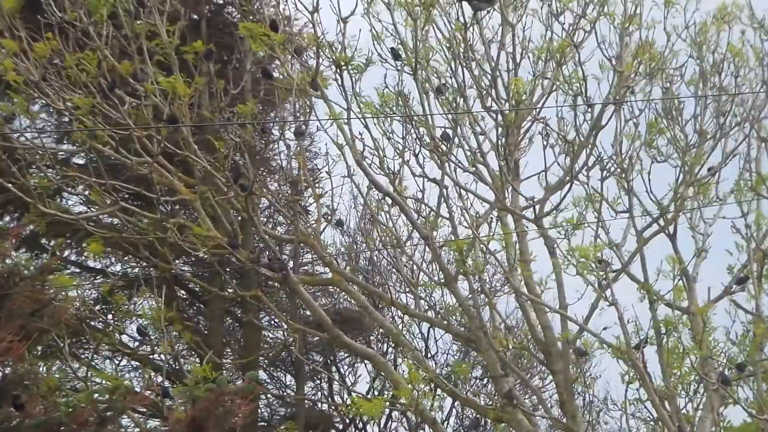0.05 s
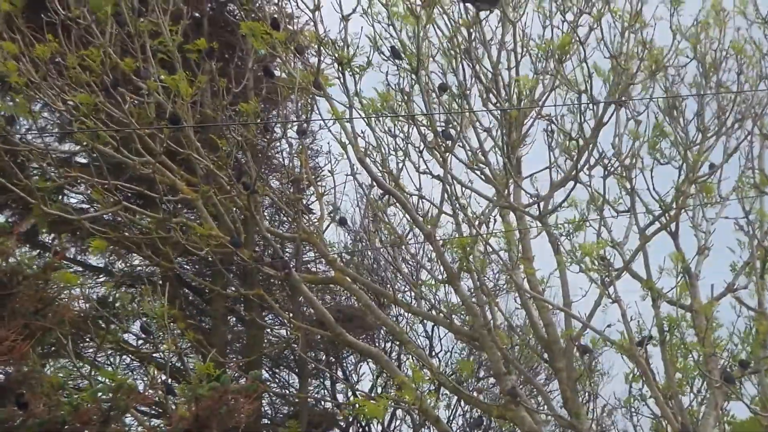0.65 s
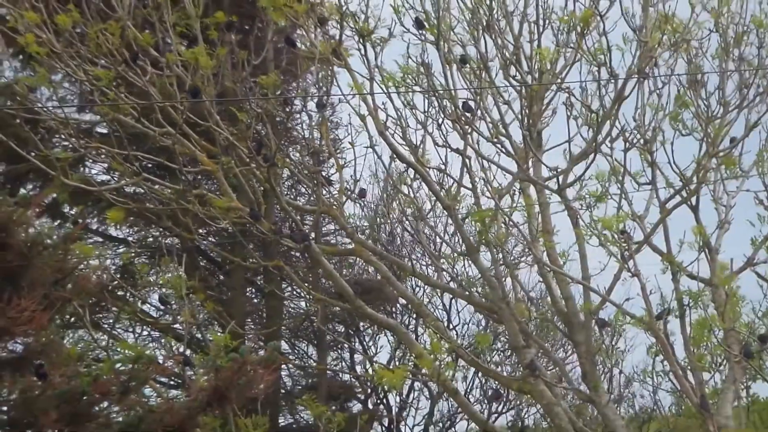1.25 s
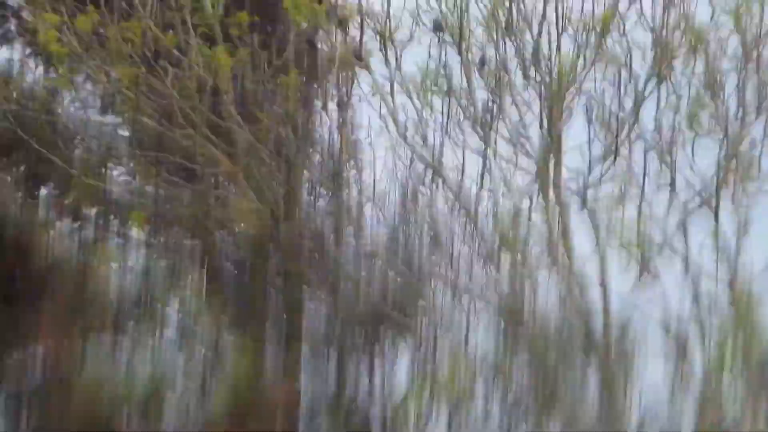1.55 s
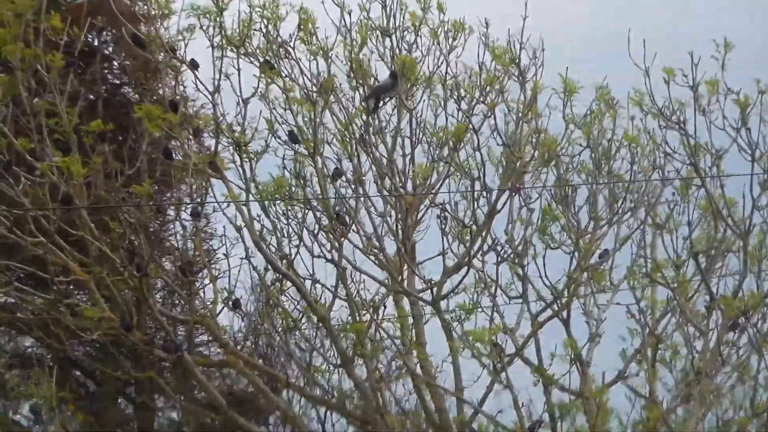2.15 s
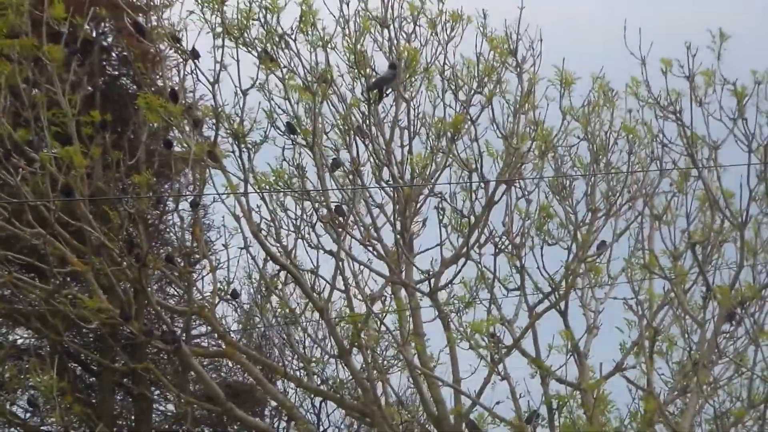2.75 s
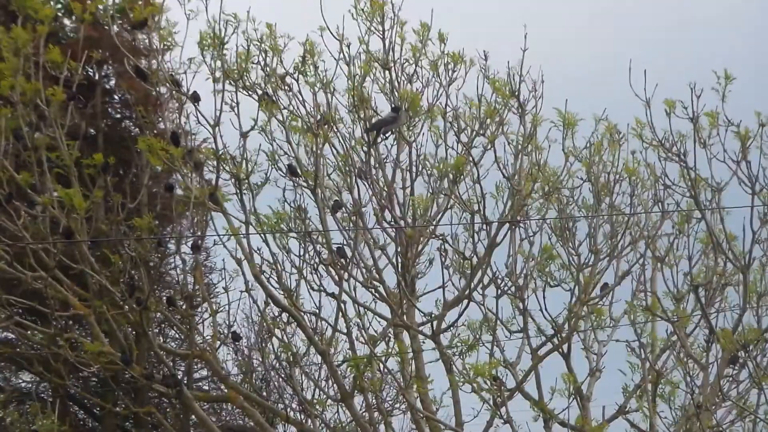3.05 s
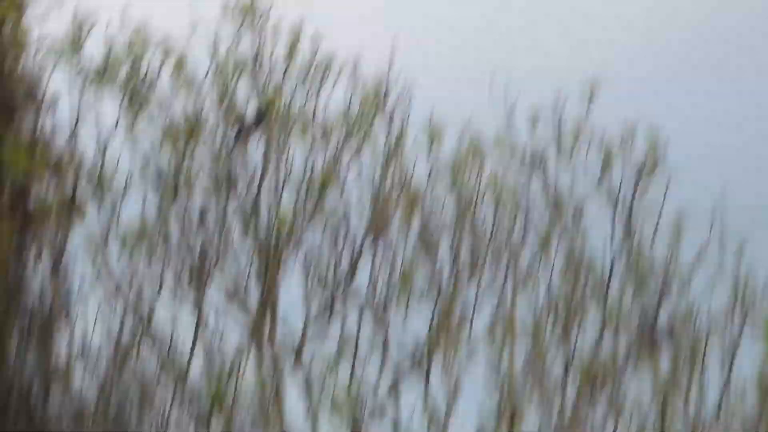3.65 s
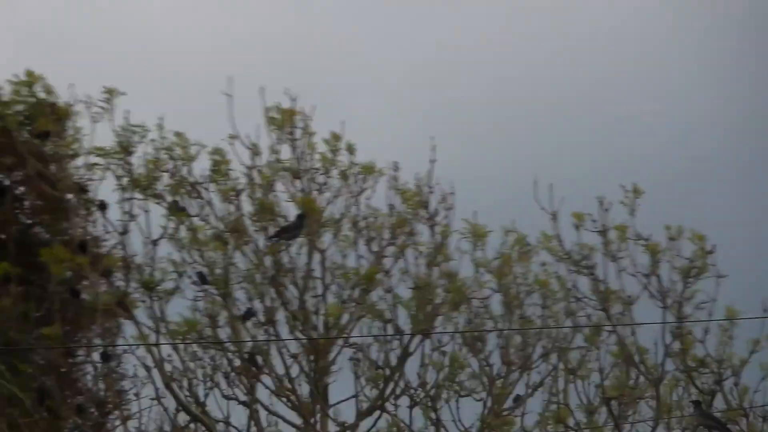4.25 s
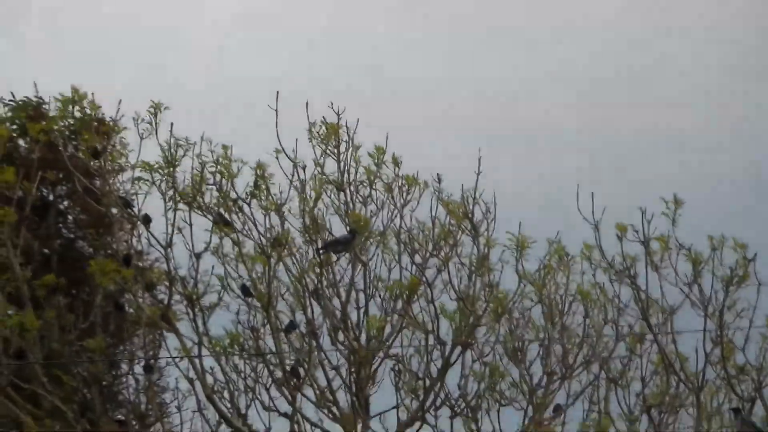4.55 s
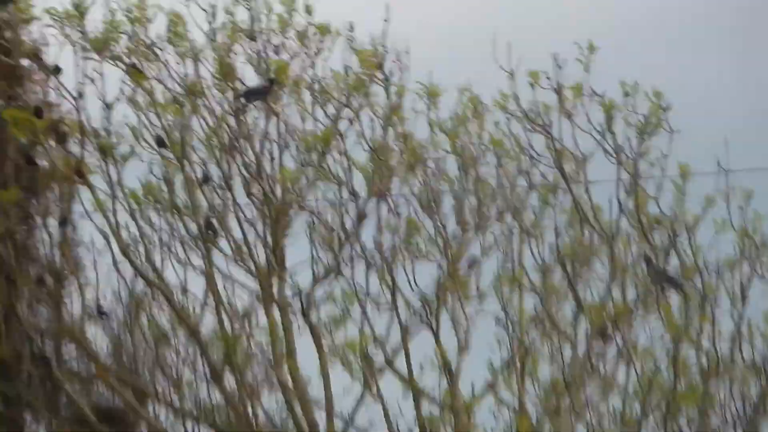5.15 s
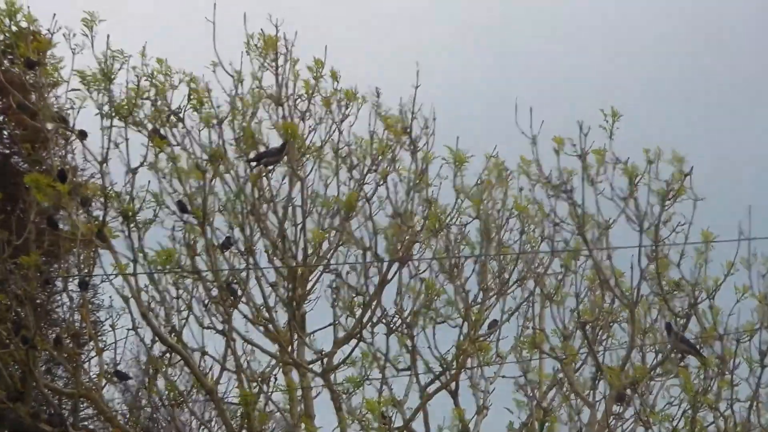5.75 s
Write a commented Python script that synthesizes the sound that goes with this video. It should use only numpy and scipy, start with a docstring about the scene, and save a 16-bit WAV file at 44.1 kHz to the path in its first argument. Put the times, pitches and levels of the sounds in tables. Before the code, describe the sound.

Sparrows chirp repeatedly in tall trees, their high, slightly raspy calls leaving a short woodland echo. A distant flock chatters softly and other birds add faint gliding whistles. Light wind rumbles on and off against the microphone over a soft outdoor hiss. Late on, a hand shifts on the camera, bringing a close, scuffing run of plastic creaks and then separate ticks, while the birds carry on.

```python
"""From the start, sparrows chirp in tall trees, each call scattered by trunks and twigs, while a far
flock chatters and light wind buffets the microphone openings. After a second other birds whistle
farther off. Near 2 s the wind picks up and the hand-held camera rubs softly. From about 4.3 s it is
re-aimed: the palm scuffs it, and its plastic shell sticks and slips in three creaks, then in lone
ticks. More whistles join the last chirps."""
import sys
import numpy as np
from scipy import signal
from scipy.fft import rfft, irfft, next_fast_len
from scipy.io import wavfile
from scipy.ndimage import map_coordinates

SR = 44100
rng = np.random.default_rng(int(sys.argv[2]) if len(sys.argv) > 2 else 0)


def put_to_file(sound):
    """Save the sound as 16-bit audio at rate SR, in the file named by the first command-line argument."""
    columns = np.atleast_2d(sound).T  # one column per channel
    safe = np.clip(columns, -1, 1)
    whole_steps = np.round(safe * 32767)
    wavfile.write(sys.argv[1], SR, whole_steps.astype(np.int16))


N = 255339

# three shapes of a sparrow's note: (time [s], pitch [Hz], level [dB])
CHEEP = [(0, 4100, -14), (.011, 4650, 3), (.022, 4450, 2.5), (.038, 4200, 1), (.046, 3700, -6),
         (.060, 3450, -3.5), (.072, 3100, -16), (.080, 2800, -28)]
ARCH = [(0, 3800, -15), (.007, 4700, -3), (.017, 5280, -4), (.028, 4800, 0), (.038, 3950, 0),
        (.05, 3600, -6), (.06, 3300, -24)]
CHIP = [(0, 3400, -25), (.01, 4300, 3.5), (.02, 4750, 14.5), (.034, 4350, -3), (.05, 3700, -28),
        (.07, 3100, 10)]


def sparrows(two_note_echo_db=-3):
    """Near birds; a call opens with a thin squeak from the second side of the bird's voice box."""
    # one-note calls: (time [s], shape, pitch [ratio], length [ratio], level [dB], rasp [0-1])
    chirps = [(.180, CHEEP, 0.98, 0.97, -25.5, 0.34), (.905, CHEEP, 0.97, 1.14, -28.5, 0.66),
              (1.855, CHIP, 0.96, 0.88, -41, 0.87), (2.289, CHEEP, 0.99, 1.1, -27, .5),
              (3.096, ARCH, 0.96, 1.45, -27, 0.83), (3.662, CHEEP, 0.99, 1.2, -26.5, 0.52),
              (3.958, CHEEP, .96, 0.67, -36.5, 1), (4.272, CHEEP, 1.024, 1.42, -30, 0.77),
              (4.983, CHEEP, 0.93, 1.4, -33, 0.83), (5.145, CHEEP, 0.99, 1.16, -29, 0.66),
              (5.245, CHEEP, .97, 1.3, -36.5, 0.84), (5.303, CHIP, 1.03, 0.96, -43, .7)]
    # two-note calls, an arch then a flick, from birds in the open, with less echo:
    # (time [s], pitch [ratio], length [ratio], arch level [dB], flick level [dB], rasp [0-1])
    chirrups = [(.552, 0.98, 0.93, -27, -26, 0.15), (1.483, 0.93, 0.77, -28, -29.5, .5),
                (1.548, 0.94, 0.98, -26, -29.5, 0.58), (2.035, 0.96, 0.91, -27.5, -26.5, 0.25),
                (2.647, .9, .9, -30, -31, 0.42), (3.347, 0.96, 0.99, -30.5, -28.5, 0.35)]
    # shapes of the flick and the squeak: (time [s], pitch [Hz], level [dB])
    flick_shape = [(0, 3100, -16), (.01, 3550, -1), (.02, 4250, 0), (.029, 3650, -6), (.039, 3100, -4),
                   (.05, 2800, -23)]
    squeak_shape = [(0, 4880, 7.5), (.012, 5400, 5), (.025, 5900, 1.5), (.033, 5370, 0), (.042, 6400, -5),
                    (.06, 5450, -14)]
    out = np.zeros((2, N))
    first_notes, flicks = [(*row, 0) for row in chirps], []  # 0 dB: full echo
    for s, pitch, length, arch_db, flick_db, rasp in chirrups:
        first_notes.append((s, ARCH, pitch, length, arch_db, rasp, two_note_echo_db))
        flicks.append((s + .069 * length, flick_shape, .99, length, flick_db, rasp, two_note_echo_db))
    for s, shape, pitch, length, db, rasp, echo_db in first_notes + flicks:
        voice = bird_note(shape, pitch, length, rasp)
        call = among_trees(voice, near_db=echo_db - 4, far_db=echo_db - 2, near_fade_s=.22,
                           trunk_db=echo_db - 4)
        add(out, s, amp(db) * call)
    for s, _, _, _, db, _, echo_db in first_notes:
        voice = bird_note(squeak_shape, pitch=1, length=1.1, rasp=.9)
        squeak = among_trees(voice, near_db=1, far_db=1, near_fade_s=.15)
        add(out, s - .025, amp(db + echo_db - 24) * squeak)
    return out


def bird_note(shape, pitch, length, rasp):
    """One sliding tone from a bird's voice box; rasp shakes its pitch and loudness."""
    s, hz, db = np.transpose(shape)
    t = np.arange(int(s[-1] * length * SR)) / SR
    sweep_hz = pitch * np.interp(t / length, s, hz) * (1 + .1 * rasp * wobble(700, len(t)))
    phase = 2 * np.pi * np.cumsum(sweep_hz) / SR
    flutter = unit(amp(8 * np.minimum(rasp, .5) * np.tanh(wobble(300, len(t)))))
    level = amp(np.interp(t / length, s, db)) * flutter * signal.windows.tukey(len(t), .12)
    return level * (np.sin(phase) + amp(-37.5) * np.sin(2 * phase))


def among_trees(call, near_db, far_db, near_fade_s, trunk_db=-7, trunks=6):
    """A call arrives directly, bounces off trunks, scatters off near twigs and lingers in the wood."""
    # echo of the wood: (frequency [Hz], time to fade by 60 dB [s])
    wood_fade = [(2000, 0.6), (4300, 0.62), (8000, 0.13)]
    t = np.arange(SR * 3 // 4) / SR
    hz, times, spectrum = signal.stft(rng.standard_normal((2, len(t))), SR, nperseg=256)
    fade = amp(-60 * times / along(wood_fade, hz)[:, None])
    far = signal.istft(spectrum * fade, SR, nperseg=256)[1][:, :len(t)]
    near = rng.standard_normal((2, len(t))) * amp(-60 * t / near_fade_s)
    paths = (amp(near_db) * unit(near) + amp(far_db) * unit(far)) / np.sqrt(len(t))
    for channel, delays_s in zip(paths, rng.uniform(.002, .03, (2, trunks))):
        channel[(delays_s * SR).astype(int)] += amp(trunk_db) / np.sqrt(trunks)
    paths *= pan(-4.5)
    # the direct sound is stronger on the right
    paths[0, 0] += amp(-4.5)
    paths[1, 2] += amp(2.5)
    return signal.fftconvolve(call[None], paths, axes=1)


def creak(slips):
    """The camera shell sticks and slips beside the left microphone; fast slipping merges into a rub."""
    # sliding contact on the shell: (time [s], length [s], level [dB])
    rubs = [(1.738, 0.099, -37.5), (1.816, 0.074, -41), (1.932, 0.22, -46.5), (4.418, 0.43, -50.5),
            (4.487, 0.051, -28)]
    force, t = np.zeros(N), np.arange(SR // 100) / SR
    ring = shell_ring()
    for s, db in slips:
        # each slip is a cluster of tiny ones, longer as the movement slows
        drag_s = np.interp(s, [4.35, 4.6], [.0006, .0012])
        slip = .4 * rng.standard_normal(len(t)) * np.exp(-t / drag_s)
        slip[0] += 1
        # the first, fast slips let go more softly and are duller
        softness = np.interp(s, [4.4, 4.5], [.35, 0])
        slip = np.convolve(slip, [softness, 1, softness])
        strength = np.linalg.norm(np.convolve(slip, ring)) / np.sqrt(SR / 1000)
        add(force[None], s, amp(db + 1.5) * slip / strength)
    for s, length, db in rubs:
        size = int(length * SR)
        grit = unit(rng.standard_normal(size) * amp(0.99 * wobble(730, size))) / np.linalg.norm(ring)
        add(force[None], s, amp(db + 1) * grit * signal.windows.tukey(size, .7))
    left = signal.fftconvolve(force, ring)[:N]
    # the right side hears it smeared and dulled by the body: (frequency [Hz], gain [dB])
    dulling = [(2800, 1.5), (4700, -14.0), (6300, -21), (9500, -16), (15000, -11)]
    smear = unit(rng.standard_normal(len(t)) * np.exp(-t / .0004)) / np.sqrt(len(t))
    right = filtered(np.convolve(left, smear)[:N], lambda hz: amp(along(dulling, hz)))
    return np.array([left, right])


def shell_slips():
    """Every slip as (time [s], level [dB]); in a run the pace glides and the force may swell and ease."""
    # lone slips as the grip settles: (time [s], level [dB])
    ticks = [(3.534, -39), (4.5484, -17.7), (4.5666, -18.6), (4.7198, -26.4), (4.7471, -18.8),
             (4.7986, -18.8), (4.8825, -26.2), (4.9618, -18.3), (4.9891, -18.6), (5.0249, -18.5),
             (5.0776, -19.5), (5.1678, -24.7), (5.2137, -22.5)]
    # runs of slips: (time [s], length [s], first rate [1/s], last rate [1/s], level [dB], swell [dB])
    runs = [(4.2831, .11, 123, 79, -20.5, 5), (4.4303, .064, 55, 200, -21.5, .5),
            (4.597, .105, 66, 90, -21, 0)]
    slips = list(ticks)
    for s, length, first_rate, last_rate, db, swell_db in runs:
        progress = np.linspace(0, 1, int(length * SR))
        slips_so_far = np.cumsum(first_rate + (last_rate - first_rate) * progress) / SR
        places = np.interp(np.arange(int(slips_so_far[-1]) + 1), slips_so_far, progress)
        levels_db = db + swell_db * np.sin(np.pi * places) + rng.standard_normal(len(places))
        slips += zip(s + length * places, levels_db)
    return slips


def shell_ring(size=1024):
    """The brief, quickly damped ring of the plastic shell, scaled to a peak of 1."""
    # tone colour of the shell: (frequency [Hz], level [dB])
    shell_colour = [(100, -21), (500, -31), (1000, -30), (2000, -35.5), (3300, -17), (4000, -6), (4800, 2),
                    (6200, -5.5), (7500, -14.5), (9500, -16.5), (11500, -27), (16000, -37)]
    cepstrum = irfft(np.log(amp(along(shell_colour, np.fft.rfftfreq(size, 1 / SR)))))
    # keep the colour but pack the energy at the start, as in a tap
    cepstrum[1:size // 2] *= 2
    cepstrum[size // 2 + 1:] = 0
    ring = irfft(np.exp(rfft(cepstrum)))
    return ring / np.abs(ring).max()


def wind():
    """Swirls of wind strike each microphone separately, over the soft hiss of outdoor air."""
    # tone colours of the wind's rumble and of the air: (frequency [Hz], level [dB])
    rumble_colour = [(13, -48), (22, -20), (59, -1), (76, -2.5), (113, -0.5), (206, -13), (338, -30),
                     (365, -34.5), (500, -36), (650, -60), (1100, -120)]
    air_colour = [(25, -5), (100, -4.5), (250, -3), (500, -6), (1000, -11), (2000, -9.5), (4000, -1),
                  (8000, -16.5), (12000, -19), (16000, -20)]
    swirls = amp(3 * np.array([wobble(25, N), wobble(25, N)]))
    rumble = wind_strength() * unit(swirls * noise(rumble_colour)) * pan(3.5)
    # low sound from afar is more alike on both sides: (frequency [Hz], likeness [0-1])
    likeness = [(60, 0.34), (300, 0.61), (1200, 0.059), (4000, 0.079)]
    angle = lambda hz: np.arccos(along(likeness, hz)) / 2
    mid, side = filtered(noise(air_colour), lambda hz: np.array([np.cos(angle(hz)), np.sin(angle(hz))]))
    air = unit(np.array([mid + side, mid - side])) * pan(-1.8)
    return rumble + amp(-50 + 1.6 * wobble(2.94, N)) * air


def wind_strength(rise_s=0.0057, fall_s=0.013):
    """How hard the wind blows on the microphones: a breeze, and gusts that rise, hold and die away."""
    # the slowly changing breeze: (time [s], level [dB])
    breeze = [(0.0, -58), (0.61, -69), (1.53, -57.5), (1.74, -46.5), (2.24, -50), (2.53, -58),
              (3.11, -69.5), (3.77, -56.5), (3.9, -57.5), (4.84, -48), (5.05, -56), (5.79, -63)]
    # short gusts: (time [s], hold [s], level [dB])
    gusts = [(0.088, .15, -46), (0.88, 0.02, -40.5), (1.226, 0.068, -45), (1.511, .025, -46.5),
             (1.628, .13, -33.5), (1.865, 0.028, -38), (1.955, 0.032, -34.5), (2.167, 0.022, -33),
             (2.233, 0.05, -31), (2.351, 0.03, -33), (3.43, 0.0095, -42), (3.749, 0.022, -44),
             (4.026, 0.022, -36.5), (4.125, 0.069, -37), (4.703, 0.02, -31), (5.116, 0.0085, -39),
             (5.314, 0.053, -44.5), (5.78, .015, -37.5)]
    t = np.arange(N) / SR
    power = amp(curve(breeze) + 3.5) ** 2
    for s, hold, db in gusts:
        fade = np.maximum(s - t, 0) / rise_s + np.maximum(t - s - hold, 0) / fall_s
        power += (amp(db) * np.exp(-fade)) ** 2
    return np.sqrt(power)


def palm(slips):
    """The shifting hand scuffs the camera; once the grip is firm, slips also knock on its body."""
    # strength of the scuffing: (time [s], level [dB])
    grip = [(4.05, -68), (4.3, -61), (4.46, -52.5), (4.7, -61), (4.85, -58), (5.0, -61), (5.3, -58),
            (5.6, -70)]
    # its tone colour: (frequency [Hz], level [dB])
    scuff_colour = [(150, -31), (350, -1), (550, -0.5), (1100, -4), (2000, -15.5), (4000, -14)]
    # low ringing tones of the body: (pitch [Hz], time to fade by 60 dB [s])
    body_tones = [(430, 0.013), (640, 0.007), (1080, 0.003)]
    out = amp(curve(grip) + 2.5) * unit(noise(scuff_colour) * amp(2.6 * wobble(70, N)))
    t = np.arange(SR // 40) / SR
    tones = np.array([np.sin(2 * np.pi * hz * t) * amp(-60 * t / fade_s) for hz, fade_s in body_tones])
    for s, db in slips:
        firmness_db = np.interp(s, [4.35, 4.55], [-38, -25])
        knock = amp(rng.normal(0, 3.6, (2, len(tones)))) @ tones
        add(out, s, amp(db + firmness_db) * knock)
    return out


def whistlers():
    """Other birds, farther off, whistle gliding and slightly wavering tones."""
    # (time [s], length [s], start pitch [Hz], middle pitch [Hz], end pitch [Hz], level [dB], octave [dB])
    whistles = [(1.816, .06, 2600, 2440, 2340, -56, -24), (1.965, 0.081, 2600, 2380, 2070, -64, -24),
                (2.327, .11, 2850, 2535, 2220, -55, -30), (2.467, 0.13, 2350, 2230, 2230, -54, -30),
                (3.751, .1, 2950, 2600, 2130, -51.5, -30), (3.87, 0.096, 2220, 2170, 2100, -55, -30),
                (1.234, 0.15, 4380, 4500, 4380, -46, -35), (4.807, 0.32, 3650, 3250, 3070, -57, -19),
                (4.99, .17, 2960, 2680, 2500, -54.5, -25), (5.149, .22, 2544, 2233, 2263, -56, -25),
                (5.165, 0.064, 3900, 3580, 3400, -42, -8), (5.257, 0.063, 3800, 3794, 3430, -41.5, -18),
                (5.327, 0.11, 3450, 3140, 3040, -42, -20), (5.45, .095, 2900, 2810, 2640, -52.5, -47),
                (5.588, 0.21, 2403, 2220, 2050, -58, -9), (5.678, 0.063, 5600, 5400, 5100, -54, -15)]
    out = np.zeros((2, N))
    for s, length, start_hz, middle_hz, end_hz, db, octave_db in whistles:
        size = int(length * SR)
        glide = np.polyfit([0, .5, 1], [start_hz, middle_hz, end_hz], 2)
        hz = np.polyval(glide, np.linspace(0, 1, size)) * (1 + .019 * wobble(160, size))
        phase = 2 * np.pi * np.cumsum(hz) / SR
        tone = signal.windows.tukey(size, .5) * (np.sin(phase) + amp(octave_db) * np.sin(2 * phase))
        add(out, s, amp(db) * among_trees(tone, near_db=-6, far_db=-5, near_fade_s=.15))
    return out


def far_flock(count=90):
    """Many birds deeper in the trees, blurred by echoes into a soft chatter."""
    # loudness of the flock: (time [s], level [dB])
    chatter = [(0, -39.5), (.45, -58.5), (.8, -64), (1.2, -48), (1.8, -39), (2.5, -47.5), (2.95, -58),
               (3.5, -42), (4.2, -53.5), (4.8, -57.5), (5.45, -53), (5.7, -47)]
    out = np.zeros((2, N))
    for k, (shift, detune, loudness) in enumerate(rng.uniform(-1, 1, (count, 3))):
        call = bird_note((CHEEP, ARCH, CHIP)[k % 3], .96 + .06 * detune, length=1.1, rasp=.55)
        blurred = among_trees(call, near_db=7, far_db=11, near_fade_s=.3)
        add(out, (k + shift / 2) / count * N / SR, amp(2 * loudness) * blurred)
    return amp(curve(chatter)) * unit(out)


def amp(db):
    """Turn decibels into a gain."""
    return 10 ** (np.asarray(db) / 20)


def unit(x):
    """Scale to an average power of 1."""
    return x / np.sqrt(np.mean(x ** 2) + 1e-20)


def along(points, hz):
    """Read between (frequency [Hz], value) points on a log frequency scale."""
    frequencies, values = np.transpose(points)
    return np.interp(np.log(hz + 1), np.log(frequencies + 1), values)


def curve(rows):
    """Turn (time [s], value) rows into one value per sample."""
    return np.interp(np.arange(N) / SR, *np.transpose(rows))


def wobble(rate, size):
    """A smooth curve through rate random points a second."""
    points = rng.standard_normal(int(size * rate / SR) + 4)
    return map_coordinates(points, [np.arange(size) * rate / SR])


def filtered(x, response):
    """Scale each frequency in x by the gain response(hz)."""
    size = next_fast_len(N + SR // 2)
    return irfft(rfft(x, size) * response(np.fft.rfftfreq(size, 1 / SR)), size)[..., :N]


def noise(colour):
    """Unrelated left and right noises of one tone colour."""
    return unit(filtered(rng.standard_normal((2, N)), lambda hz: amp(along(colour, hz))))


def pan(left_db):
    """Gains that put the left side left_db above the right."""
    return amp([[left_db / 2], [-left_db / 2]])


def add(out, s, x):
    """Mix x into out, starting at s seconds."""
    start = max(0, round(s * SR))
    part = out[:, start:start + x.shape[-1]]
    part += x[..., :part.shape[1]]


def scene():
    """Birds, the hand on the camera and wind."""
    slips = shell_slips()
    return sparrows() + far_flock() + whistlers() + creak(slips) + palm(slips) + wind()


def record(dry):
    """The camera keeps nothing above 16100 Hz."""
    return filtered(dry, lambda hz: hz < 16100)


dry = scene()
out = record(dry)
put_to_file(out)
```